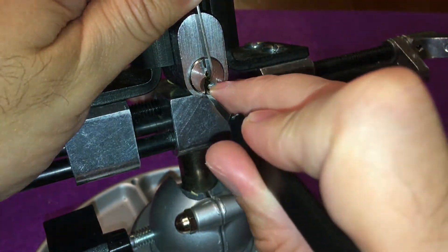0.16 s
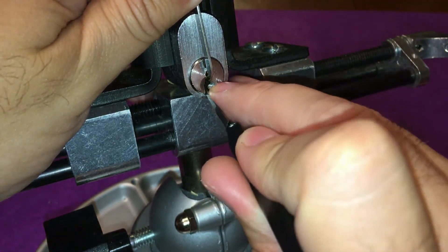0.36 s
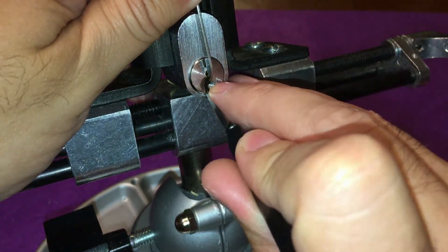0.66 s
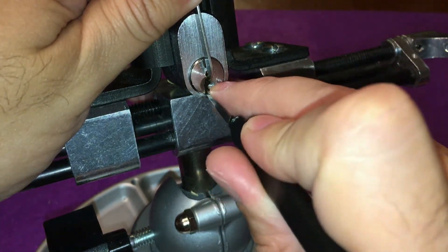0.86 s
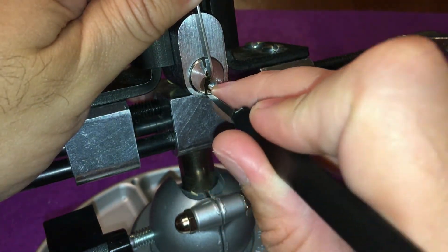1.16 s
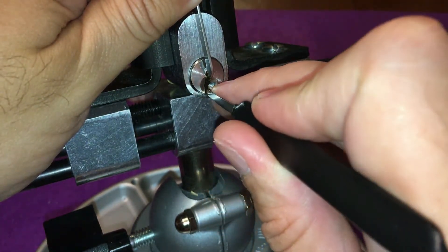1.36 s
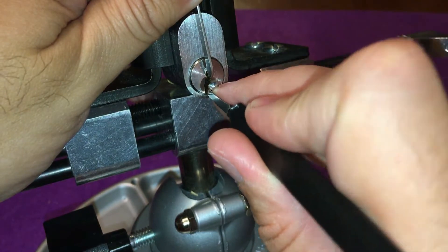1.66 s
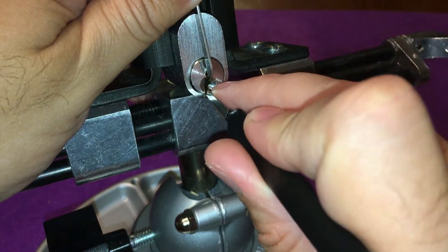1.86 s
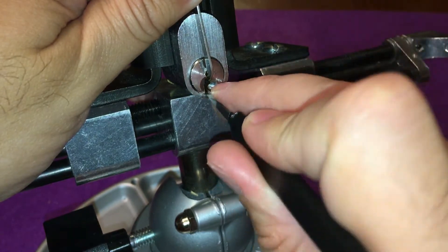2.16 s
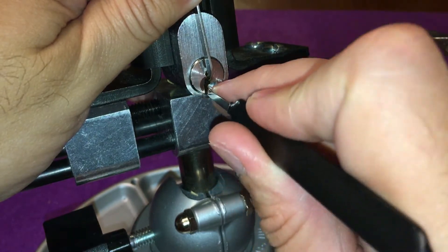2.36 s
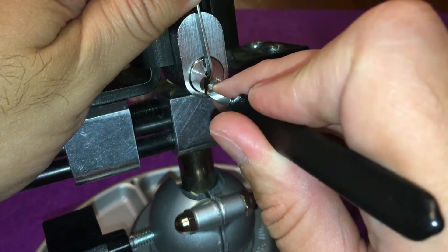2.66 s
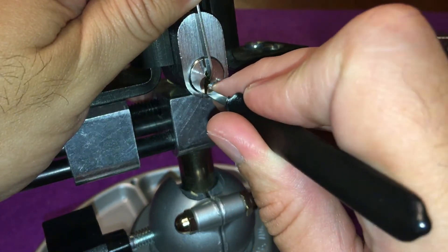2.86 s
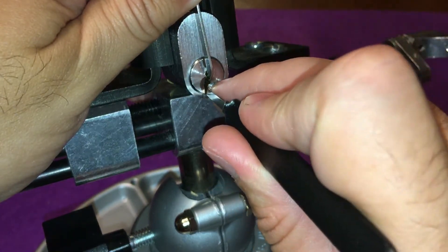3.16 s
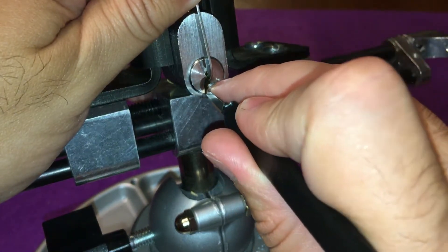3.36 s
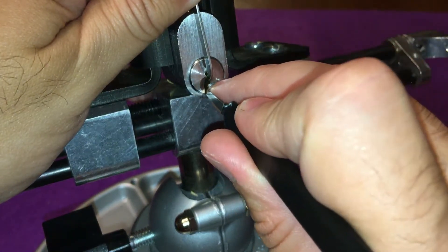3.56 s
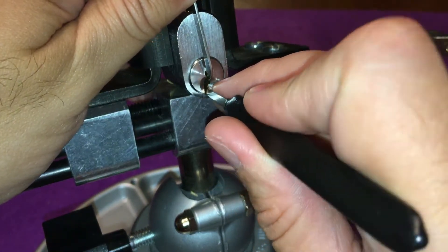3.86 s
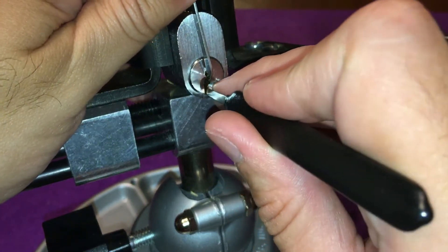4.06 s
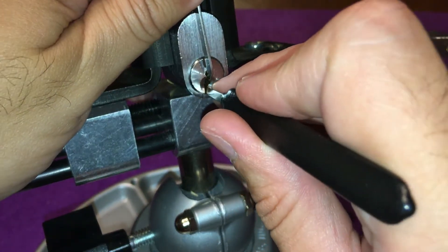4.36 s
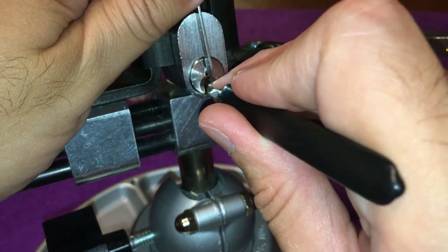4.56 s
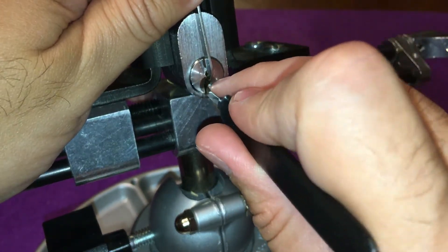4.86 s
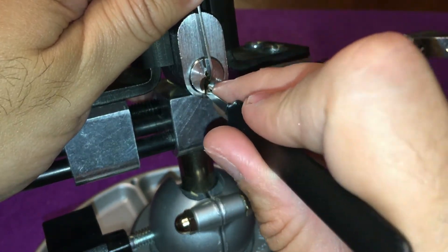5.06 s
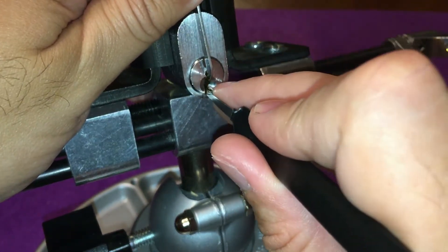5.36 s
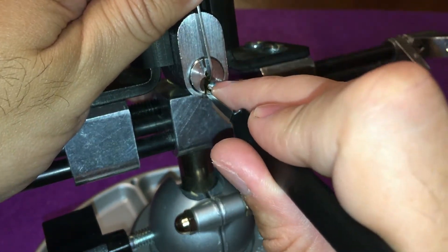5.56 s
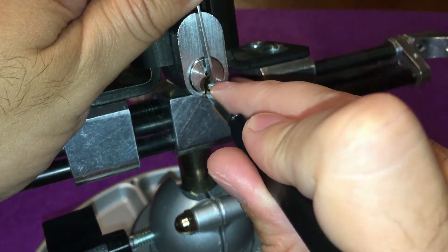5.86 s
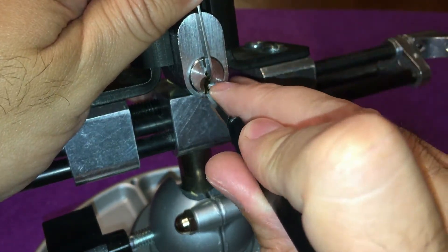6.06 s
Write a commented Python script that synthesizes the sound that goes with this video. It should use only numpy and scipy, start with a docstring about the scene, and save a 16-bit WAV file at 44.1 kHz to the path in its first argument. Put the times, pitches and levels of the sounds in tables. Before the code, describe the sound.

A steel pick probes a brass lock cylinder clamped in a small vise. Light, irregular ticks, faint scrapes and small ringing knocks come first. A pin snaps, then a quick cluster of sharper, louder snaps follows, then a couple more, and one hard metallic knock ends it. The microphone is very close, in a quiet room with a faint hiss.

```python
"""A quiet room, a phone close to a lock cylinder in a small vise, a steel pick working the pins.
First come light ticks, faint scrapes in the keyway and knocks that ring the brass and the vise.
A pin snaps and bounces at 2 s, five more between 3.2 and 4 s, and two shortly before 5 s.
The last snap, at 6 s, comes with the hardest knock. All along the phone's noise suppressor
holds the background hiss down, letting go for a moment after the sharpest clicks."""
import sys
import numpy as np
from scipy import signal
from scipy.fft import rfft, irfft
from scipy.io import wavfile
from scipy.ndimage import uniform_filter1d

SR = 44100
rng = np.random.default_rng(int(sys.argv[2]) if len(sys.argv) > 2 else 0)


def dump_mix(stems):
    """Bounce the given channels to the path in sys.argv[1] as a 16-bit WAV at rate SR."""
    frames = np.atleast_2d(stems).T  # one column per channel
    limited = np.clip(frames, -1, 1)  # hard clip at full scale
    pcm = np.round(limited * 32767).astype(np.int16)
    wavfile.write(sys.argv[1], SR, pcm)


N = 273420

# Pins snapping past the shear line. Each row: start in seconds, level in dB, brightness centre in Hz,
# fall from it in dB per octave squared, t60 in seconds, rebound level in dB, rebound centre in Hz.
PIN_SNAPS = [(1.9637, -16.5, 10800, 2, .004, -19, 11300), (3.2316, -5, 12000, 9, .004, -8.5, 13500),
             (3.2989, -8.5, 13500, 32, .005, -19, 13700), (3.3273, -7.5, 11100, 12.5, .006, -18, 13500),
             (3.5287, -10.5, 13100, 17, .0035, -25, 12930), (3.9492, -8.5, 10600, 5, 0.0041, -20, 13000),
             (4.7286, -23.5, 10670, 5.5, 0.0042, -40.5, 11000),
             (4.9664, -6.5, 12350, 23, 0.0027, -26, 11900), (5.979, -11.5, 7740, 40, .005, -18.5, 7900)]
# Light touches of the pick. Each row: start in seconds, level in dB, brightness centre in Hz.
PICK_TOUCHES = [(0.0685, -45, 10600), (0.0867, -34.5, 11100), (0.1251, -47, 14100), (0.1976, -42.5, 9400),
                (1.5408, -45.5, 13400), (1.5732, -41, 11200), (1.5859, -36.5, 12600), (1.9705, -33, 10600),
                (1.9813, -35, 9500), (2.0184, -37.5, 11400), (2.0223, -36, 12200), (2.0285, -40, 11100),
                (2.387, -45, 10800), (2.5954, -27.5, 13500), (2.8976, -33.5, 13400), (3.0787, -48, 11000),
                (3.208, -53, 11800), (3.4799, -31, 8900), (3.558, -40, 10900), (4.5349, -43, 10100),
                (4.8, -38.5, 10100), (4.9266, -40, 9800), (5.0806, -39, 10100), (5.0954, -37.5, 8500),
                (5.2024, -49, 11400), (5.2195, -42, 11400)]
# Loose pins chattering. Each row: start and end in seconds, typical level in dB.
PIN_CHATTER = [(0.096, .135, -58.5), (1.972, 1.99, -49), (4.746, 4.761, -55), (5.068, 5.08, -44)]
# Pins, springs and pick tip. Each row: frequency in Hz, level in dB, factor on the tick's t60.
PIN_MODES = [(3400, -12, .7), (4200, -11, .7), (5200, -4, .8), (5660, -30, 20), (6100, -2, .9),
             (7000, -3, .9), (7900, -2, 1), (8500, -3, .9), (9250, -1, 1.1), (9750, -3, .9),
             (10900, -7, .9), (11500, -4, 1), (12400, -6, .9), (13200, -1, 1.3), (13880, 0, 1.4),
             (14700, -5, .9), (15300, -4, .9), (16000, -7, .7)]
# Knocks into the cylinder. Each row: start in seconds, peak in dB, brightness centre in Hz.
CYLINDER_KNOCKS = [(0.042, -56, 1720), (0.0685, -45, 1790), (0.0864, -45, 1310), (0.1233, -50, 1310),
                   (0.1973, -47, 1660), (0.409, -59, 2500), (0.8039, -39, 2140), (1.5738, -47.5, 1360),
                   (1.6412, -53.5, 2470), (1.744, -56, 1370), (1.9645, -34, 2330), (1.9818, -43.5, 2510),
                   (2.0192, -45, 1800), (2.387, -53.5, 2400), (2.5148, -55, 3320), (2.5932, -44.5, 1350),
                   (2.8982, -46.5, 2440), (3.2328, -24, 2340), (3.2987, -27, 2000), (3.327, -28, 1600),
                   (3.4828, -32.5, 2110), (3.5286, -37, 3120), (3.866, -55.5, 1890), (3.9482, -36, 2400),
                   (4.5317, -56, 1760), (4.7287, -31.5, 1820), (4.8006, -35, 2010), (4.9656, -27, 1400),
                   (5.095, -38.5, 2880), (5.1787, -47, 1400), (5.2195, -56, 2650), (5.9792, -19, 2500)]
# The brass in its jaws. Each row: frequency in Hz, level in dB, unscaled t60 in seconds.
CYLINDER_MODES = [(720, -16, 0.02505), (1004, -7, 0.028), (1113, -16.5, 0.2), (1307.4, -10.5, 0.23),
                  (1414, 5.5, 0.014), (1794, -3, 0.087), (1941, -1.5, 0.062), (2130, -15, 0.28),
                  (2333, -2.5, 0.096), (2445, -6.5, 0.092), (2514, -9, 0.19), (2577, 4.5, 0.026),
                  (2924, -12.5, 0.065), (3296, -1, 0.063), (3387, -13, 0.11), (3630, 0.5, 0.048),
                  (4014, -14, .12), (5190, -0.5, 0.048), (5340, -18, 0.17), (5700, -9.5, 0.071)]
# Wrench tension damping the brass. Each row: time in seconds, factor on a knock's t60.
WRENCH_SLACK = [(0, 0.98), (.8, 1), (2, 0.62), (2.6, 1), (3.3, 0.74), (4.8, .9), (4.97, 0.64), (5.2, 0.92),
                (6, 0.51)]
# Shoves of the whole vise. Each row: start in seconds, ball joint level in dB, arm level in dB.
VISE_SHOVES = [(0.802, -59, -65), (1.963, -46.5, -40.5), (2.016, -74, -44), (2.596, -48, -58.5),
               (3.947, -42.5, -53.5), (4.8, -49.5, -47.5), (4.965, -64, -60), (5.979, -50.5, -50)]
# Jaw, ball joint, arm and base, in that order. Each row: frequency in Hz, t60 in seconds.
VISE_MODES = [(556.6, 0.069), (403.7, 0.09), (256, .38), (99, 0.26)]
# The pick sliding in the keyway. Each row: start and end in seconds, rms in dB, centre in Hz.
KEYWAY_SCRAPES = [(0.092, 0.115, -64, 2700), (1.549, 1.57, -67, 2020), (4.523, 4.559, -66.5, 2240),
                  (4.916, 4.949, -56, 2400), (5.066, 5.089, -58.5, 1900), (5.18, 5.24, -68, 2200)]
# Echoes off the table top and things nearby. Each row: delay in seconds, level in dB.
NEAR_ECHOES = [(.0036, -23.5), (.0058, -30.5), (0.0095, -39), (.0155, -48)]
# The room's reverberation. Each row: frequency in Hz, t60 in seconds, level in dB.
ROOM_DECAY = [(253, 0.4, -14), (1000, 0.22, -13.5), (3000, 0.73, -12.5), (7010, .3, -18.5),
              (14160, 0.53, -26.5)]
# Steady background hiss, cut off sharply just below 16 kHz.
# Each row: frequency in Hz, relative density in dB.
HISS_SPECTRUM = [(22, -32), (38, -7), (55, 4), (135, -0.5), (330, -2), (580, -9), (1400, -12.5),
                 (2200, -14.5), (3100, -13), (4300, -17.5), (9400, -17), (10400, -16.5), (15600, -16.5),
                 (15950, -55.5)]
# Machinery far off. Each row: frequency in Hz, rms in dB, bandwidth in Hz.
MACHINE_HUMS = [(50, -71, 10.5), (293.6, -74, 5.49), (600, -82.5, 8.)]
# The deepest the phone's suppressor ducks. Each row: frequency in Hz, gain in dB.
SUPPRESSOR_DEPTH = [(60, -1), (400, -7.5), (1500, -7.5), (15000, -10.5)]

TICK_T60_S, TICK_SLOPE_DB = .0035, 6  # slopes are in dB per octave squared
REBOUND_GAP_S, REBOUND_T60_S, REBOUND_SLOPE_DB, REBOUND_FALL_DB = .0013, .002, 60, -3
CHATTER_PER_S, CHATTER_HZ, CHATTER_SPREAD_DB = 140, 11500, 5
MODE_SCATTER_DB, SLIPS_PER_S, HISS_DB = 1.8, 2500, -61.5
CASE_DELAY_S, CASE_REFLECTION = .000476, -.2
TRIGGER_DB, TRIGGER_HZ, HOLD_S = -15, 10500, .406
LOW_METER_S, TREBLE_METER_S, TREBLE_HZ = .012, .002, 4500
LOW_CUT_HZ, HIGH_CUT_HZ = 38, 16700


def pins():
    """Right at the microphone, pins snap and rebound twice, tick under the pick and chatter loosely."""
    out = np.zeros(N)
    for s, db, hz, slope_db, t60, rebound_db, rebound_hz in PIN_SNAPS:
        add(out, s, tick(db, hz, t60, slope_db))
        for bounce, level in enumerate([rebound_db, rebound_db + REBOUND_FALL_DB], 1):
            add(out, s + bounce * REBOUND_GAP_S, tick(level, rebound_hz, REBOUND_T60_S, REBOUND_SLOPE_DB))
    for s, db, hz in PICK_TOUCHES:
        add(out, s, tick(db, hz))
    for start, end, db in PIN_CHATTER:
        for slot in np.arange(start, end, 1 / CHATTER_PER_S):
            s = slot + rng.random() / CHATTER_PER_S
            add(out, s, tick(db + CHATTER_SPREAD_DB * rng.standard_normal(), CHATTER_HZ))
    return out


def tick(db, hz, t60=TICK_T60_S, slope_db=TICK_SLOPE_DB):
    """Hard contact: a broadband crack, then short high rings, detuned by where the pins stand."""
    sound = ring(PIN_MODES, hz, slope_db, rise_s=.00014, length=4200, t60_scale=t60, detune=.008)
    t = np.arange(1024) / SR
    crack = np.diff(rng.standard_normal(1025)) * t * np.exp(-t / .00029)
    add(sound, 0, gain_of(-6 - .2 * slope_db) * crack / abs(crack).max())
    return gain_of(db) * sound


def ring(modes, centre_hz, slope_db, rise_s, length, t60_scale, detune=0):
    """Struck metal: dying sines, weaker away from the centre, new at each blow; their sum peaks at 1."""
    hz, db, t60 = np.transpose(modes)[:, :, None]
    t = np.arange(length) / SR
    scatter, shift, phase = rng.standard_normal((len(modes), 3, 1)).transpose(1, 0, 2)
    hz = hz * (1 + detune * shift)
    level_db = db - slope_db * np.log2(hz / centre_hz) ** 2 + MODE_SCATTER_DB * scatter
    envelopes = gain_of(level_db - 60 * t / (t60 * t60_scale))
    out = (envelopes * np.sin(2 * np.pi * (hz * t + phase))).sum(0)
    out *= 1 - np.exp(-t / rise_s)
    return out / abs(out).max()


def cylinder():
    """The brass rings after each knock, swelling as the blow spreads; wrench tension shortens it."""
    out = np.zeros(N)
    for s, db, hz in CYLINDER_KNOCKS:
        slack = np.interp(s, *np.transpose(WRENCH_SLACK))
        length = round(140 * (db + 85))  # samples until the ring sinks into the hiss
        sound = ring(body_modes(), hz, slope_db=6, rise_s=.00033, length=length,
                     t60_scale=slack, detune=.0046)
        add(out, s, gain_of(db) * sound)
    return out


def body_modes():
    """The cylinder's modes plus a random, quickly damped crowd from plug, wrench and jaws."""
    return CYLINDER_MODES + [(1250 * 3.3 ** place, -8, .03) for place in rng.random(40)]


def vise():
    """A shove swings jaw, ball joint, arm and base at one low mode each; a knock, only the first two."""
    out, t = np.zeros(N), np.arange(SR // 2) / SR
    shoves = [(s, joint - 3.5, joint, arm, arm - 3.5) for s, joint, arm in VISE_SHOVES]
    knocks = [(s, db - 20, db - 31) for s, db, _ in CYLINDER_KNOCKS]
    for s, *levels in shoves + knocks:
        for db, (hz, t60) in zip(levels, VISE_MODES):
            onset = 1 - np.exp(-t * hz * 2.34)  # builds over about a cycle
            add(out, s, gain_of(db - 60 * t / t60) * onset * np.sin(2 * np.pi * hz * t))
    return out


def scrapes():
    """The pick drags in the keyway: tiny uneven slips excite the cylinder and, faintly, the pins."""
    out = np.zeros(N)
    for start, end, db, hz in KEYWAY_SCRAPES:
        length = round((end - start) * SR)
        slips = rng.standard_normal(length) * (rng.random(length) < SLIPS_PER_S / SR)
        slips *= signal.windows.tukey(length, .6)
        body = ring(body_modes(), hz, slope_db=5, rise_s=.00047, length=4096, t60_scale=.18)
        tip = ring(PIN_MODES, centre_hz=8600, slope_db=5, rise_s=.0001, length=4096, t60_scale=.0063)
        sound = signal.fftconvolve(slips, body + gain_of(-6.5) * tip)
        add(out, start, gain_of(db) * sound / rms(sound[:length]))
    return out


def room(x):
    """The room answers: a few near echoes, then sparse reflections dying away band by band."""
    taps, spacing = np.zeros(SR // 2), 10
    slots = np.arange(200, len(taps) - spacing, spacing)
    taps[slots + rng.integers(0, spacing, len(slots))] = rng.choice([-1., 1.], len(slots))
    hz, t, spectrum = signal.stft(taps, SR, nperseg=256)
    t60 = curve_at([row[:2] for row in ROOM_DECAY], hz)
    wet_db = curve_at([row[::2] for row in ROOM_DECAY], hz)
    energy = t60 * SR / spacing / (2 * np.log(1000))  # squared decay summed over the taps
    decay = gain_of(wet_db - 60 * t / t60) / np.sqrt(energy)
    response = signal.istft(spectrum * decay, SR, nperseg=256)[1]
    for delay, db in NEAR_ECHOES:
        response[round(delay * SR)] += gain_of(db)
    return signal.fftconvolve(x, response)[:N]


def hiss():
    """Steady background hiss, lumpy in the bass and cut off sharply just below 16 kHz."""
    frames, hz = N // 256 + 5, np.fft.rfftfreq(1024, 1 / SR)
    real, imag, lumps = rng.standard_normal((frames, len(hz), 3)).T
    lumps = uniform_filter1d(uniform_filter1d(lumps, 6, axis=0), 10, axis=1)
    lumps_db = .75 * lumps / rms(lumps) * np.exp(-hz / 900)[:, None]
    spectrum = (real + 1j * imag) * gain_of(curve_at(HISS_SPECTRUM, hz) + lumps_db)
    noise = signal.istft(spectrum, nperseg=1024, noverlap=768)[1][:N]
    return gain_of(HISS_DB) * noise / rms(noise)


def machinery():
    """Far-off machines hum: narrow, wavering bands of noise."""
    out, t = np.zeros(N), np.arange(N) / SR
    for hz, db, width_hz in MACHINE_HUMS:
        pole = np.exp(-np.pi * width_hz / SR)
        waver = signal.lfilter([1], [1, -pole], rng.standard_normal(N) + 1j * rng.standard_normal(N))
        hum = (waver * np.exp(2j * np.pi * hz * t)).real
        out += gain_of(db) * hum / rms(hum)
    return out


def case_echo(x):
    """Sound from all sides bounces once, inverted, inside the phone's case, rippling its spectrum."""
    hz = np.fft.rfftfreq(N, 1 / SR)
    ripple = 1 + CASE_REFLECTION * np.exp(-2j * np.pi * hz * CASE_DELAY_S)
    return irfft(rfft(x) * ripple, N)


def suppressor(x):
    """The phone ducks bands near the steady noise floor, but lets go after a sharp treble click."""
    hz, t, spectrum = signal.stft(x, SR, nperseg=256, noverlap=192)
    power = uniform_filter1d(uniform_filter1d(abs(spectrum) ** 2, 13, axis=0), 5, axis=1) + 1e-20
    floor = np.median(power, axis=1, keepdims=True)
    wide = uniform_filter1d(power, 21, axis=0) / uniform_filter1d(floor, 21, axis=0)
    poles = np.exp(-(t[1] - t[0]) / np.where(hz < TREBLE_HZ, LOW_METER_S, TREBLE_METER_S))
    slow = np.array([signal.lfilter([1 - pole], [1, -pole], band) for pole, band in zip(poles, wide)])
    over_floor = np.maximum(power / floor, slow)  # the fast meter passes clicks, the slow one tails
    gain = np.sqrt(np.clip(1 - 1.21 / over_floor, 0, 1))  # takes off the floor's power
    gain = np.maximum(gain, gain_of(curve_at(SUPPRESSOR_DEPTH, hz)))
    treble = signal.sosfiltfilt(signal.butter(4, TRIGGER_HZ, "high", fs=SR, output="sos"), x)
    click_s = np.where(abs(treble) > gain_of(TRIGGER_DB), np.arange(N) / SR, -1)
    last_click_s = np.maximum.accumulate(click_s)[np.minimum((t * SR).astype(int), N - 1)]
    released = uniform_filter1d((t - last_click_s < HOLD_S) * 1., 5)
    gain = released + (1 - released) * gain
    return signal.istft(spectrum * gain, SR, nperseg=256, noverlap=192)[1][:N]


def gain_of(db):
    """Decibels to a factor."""
    return 10 ** (np.asarray(db) / 20)


def rms(x):
    """Root mean square, never zero."""
    return np.sqrt(np.mean(x ** 2) + 1e-20)


def curve_at(points, hz):
    """Interpolates on a log-frequency axis, one row per band."""
    point_hz, values = np.transpose(points)
    return np.interp(np.log(hz + 1), np.log(point_hz + 1), values)[:, None]


def add(mix, s, sound):
    """Mixes a sound in at s seconds."""
    part = mix[round(s * SR):][:len(sound)]
    part += sound[:len(part)]


def scene():
    """The lock close up and direct; behind it the room, the hiss and the distant hum."""
    lock = pins() + cylinder() + vise() + scrapes()
    background = room(lock) + hiss() + machinery()
    return (lock + case_echo(background))[None]


def record(dry):
    """The phone's mono microphone feeds its noise suppressor, a low cut and a steep high cut."""
    low_cut = signal.butter(4, LOW_CUT_HZ, "high", fs=SR, output="sos")
    high_cut = signal.firwin(511, HIGH_CUT_HZ, window=("kaiser", 9), fs=SR)
    out = signal.sosfilt(low_cut, suppressor(dry[0]))
    return signal.oaconvolve(out, high_cut, "same")[None]


dry = scene()
out = record(dry)
dump_mix(out)
```